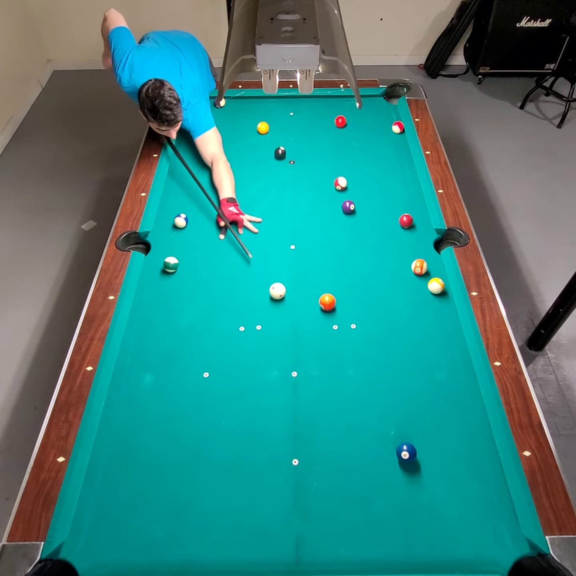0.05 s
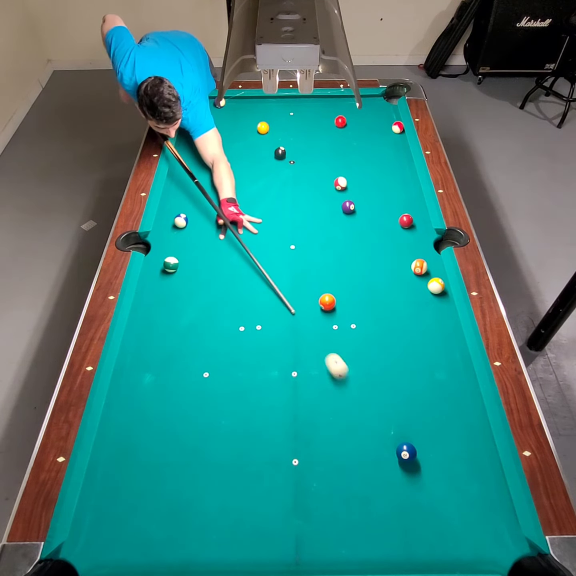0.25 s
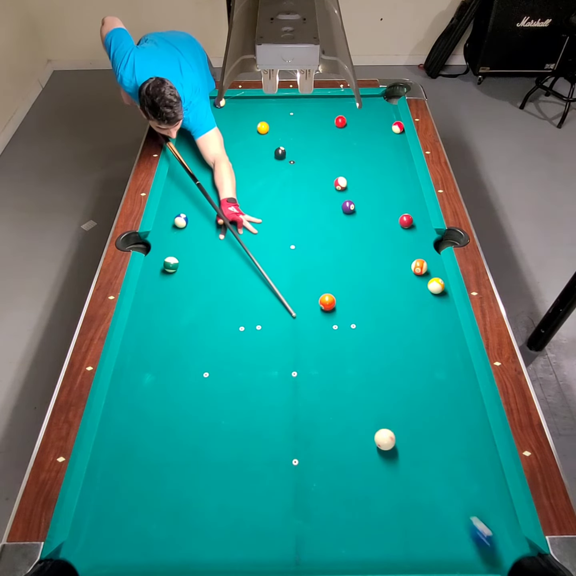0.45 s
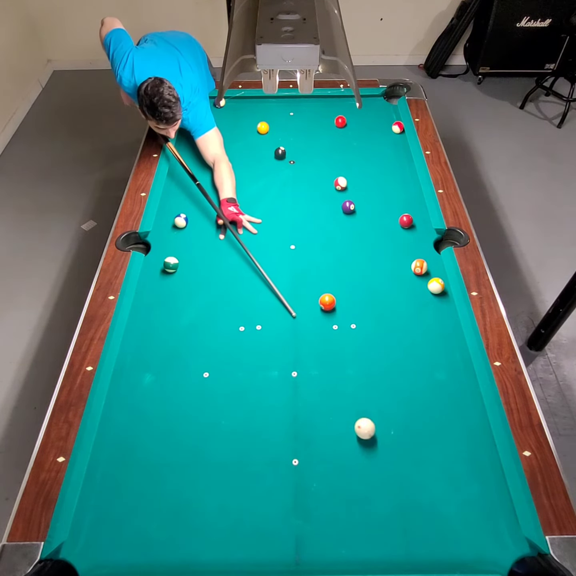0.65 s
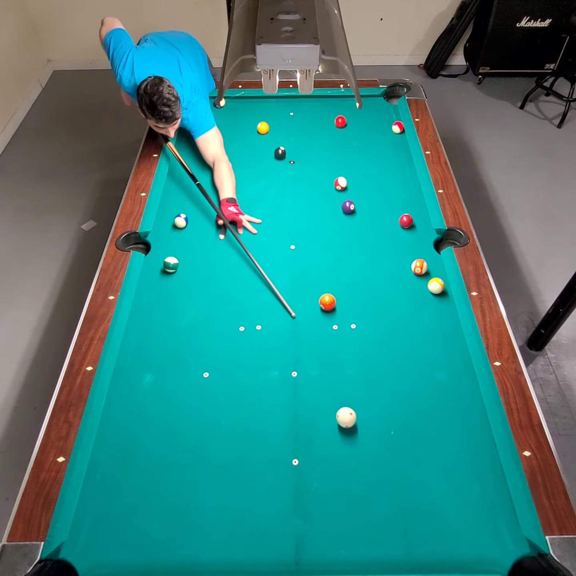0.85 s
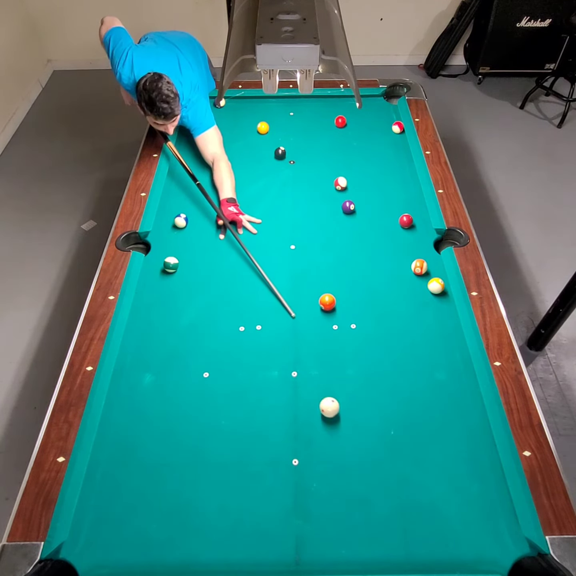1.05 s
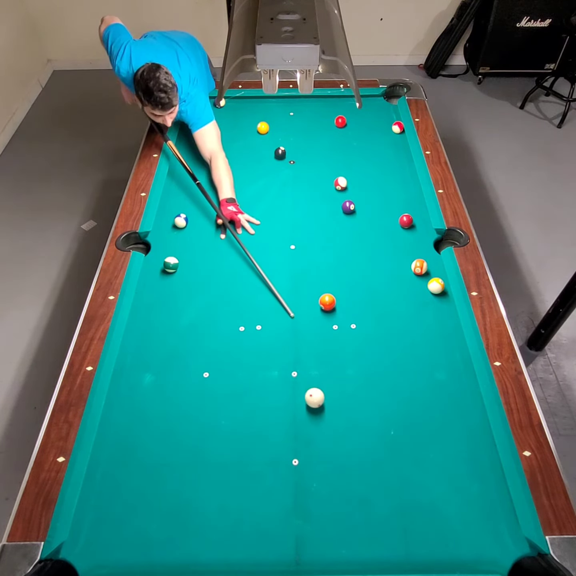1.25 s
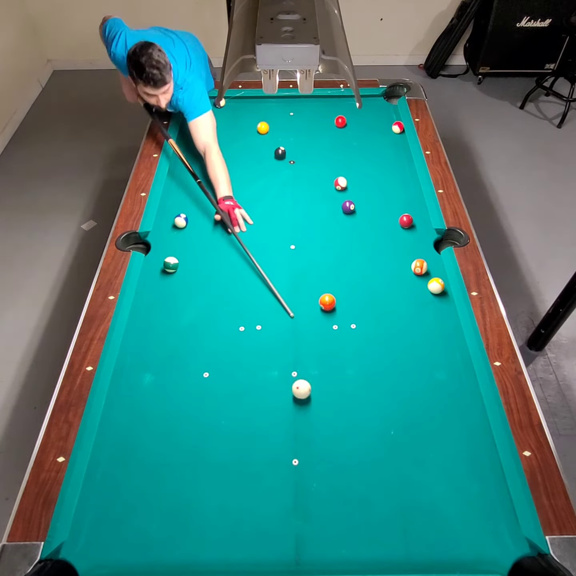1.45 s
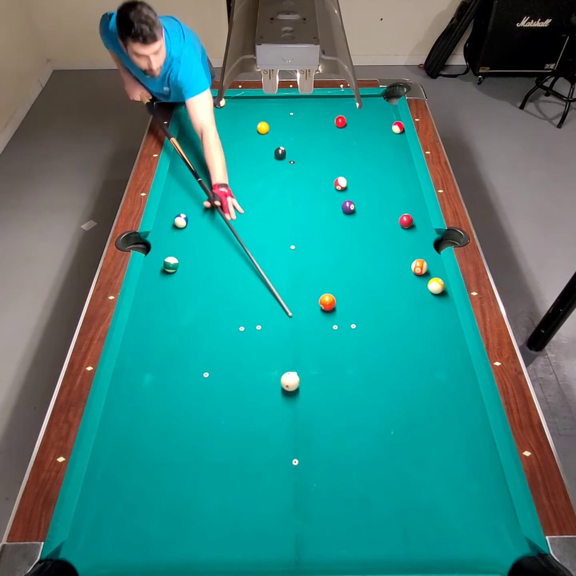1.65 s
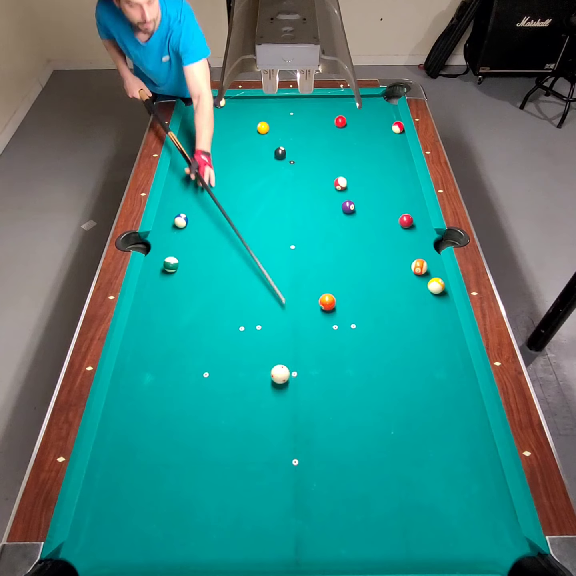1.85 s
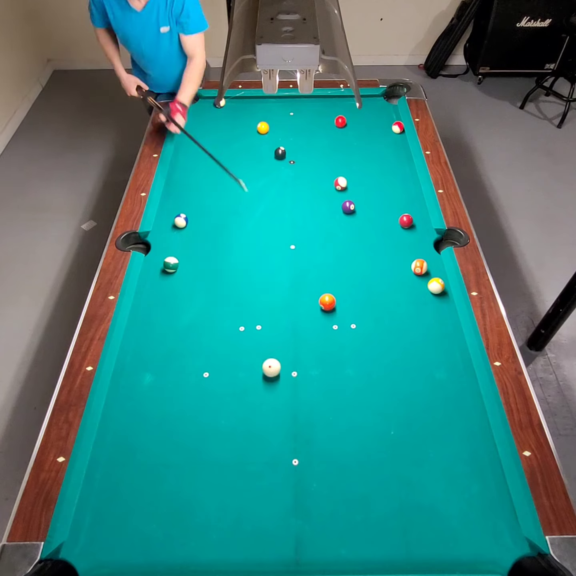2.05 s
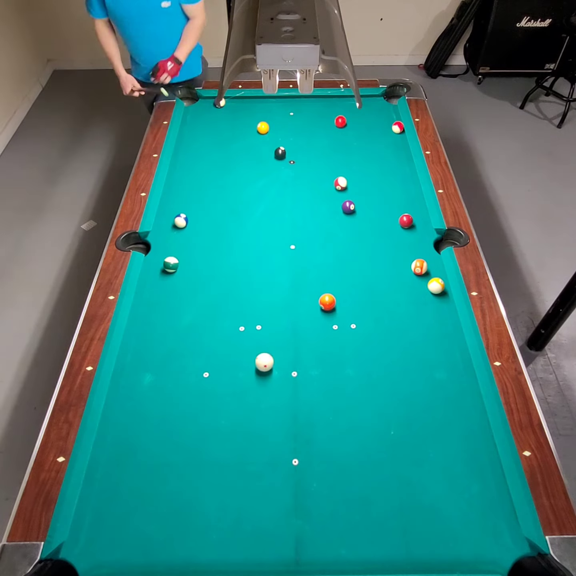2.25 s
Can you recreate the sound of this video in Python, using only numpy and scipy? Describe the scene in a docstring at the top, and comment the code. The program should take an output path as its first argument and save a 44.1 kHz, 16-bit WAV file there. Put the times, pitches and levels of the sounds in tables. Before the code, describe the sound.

A pool shot: cue strike, ball click, then a pocketed ball rumbling through the table.

```python
"""Pool shot in a small, hard room

Heard from the foot of the table. The cue hits the white ball, which clicks against a second ball.
That one rattles into the near right pocket, then rolls and knocks down the return channel inside
the wooden cabinet. Underneath: low room noise and a faint rustle of the player's clothes."""
import sys
import numpy as np
from scipy import signal
from scipy.fft import rfft, irfft, next_fast_len
from scipy.io import wavfile

SR = 44100
rng = np.random.default_rng(int(sys.argv[2]) if len(sys.argv) > 2 else 0)


def output_pcm(signal):
    """Save a mono or channel-first signal as 16-bit PCM at the path in sys.argv[1].

    Samples are clipped to [-1, 1] before scaling.
    """
    pcm = np.clip(np.atleast_2d(signal).T, -1, 1) * 32767
    wavfile.write(sys.argv[1], SR, np.round(pcm).astype(np.int16))


N = 101429
T = np.arange(N) / SR
TAIL_S = T[:int(SR * .8)]  # time axis of one blow
BLOW_S, LEFT_LAG_S = .03, 0.00019
CUE_S, CLICK_S, GRAZE_S = .2241, .4354, .596
CABINET_WET_DB, HOLLOW_WET_DB = -1, -0.5

# room decay (frequency [Hz], t60 [s])
ROOM_DECAY = [(60, 0.11), (300, 0.1842), (1000, 0.2542), (2500, 0.4626), (5000, 0.38), (9000, 0.1851),
              (15000, 0.39)]
# stereo width (frequency [Hz], side over mid [dB])
STEREO_WIDTH = [(60, -15), (160, -13), (350, -7.5), (700, 0.5), (1300, 0.5), (16000, 1.5)]
# room noise, rolling rumble, cabinet boom spectra (frequency [Hz], level [dB])
AIR_SPECTRUM = [(12, -56.5), (30, -36), (55, -13), (140, 0.5), (200, -1.5), (400, -4.5), (700, -12.5),
                (1200, -23), (2500, -24), (4500, -36.5), (6500, -43.5), (8500, -58), (16000, -53)]
RUMBLE_SPECTRUM = [(80, -14), (140, -1.5), (190, -6.5), (270, 5.5), (400, 4.5), (620, 0.5), (850, -8),
                   (1100, -12), (1400, -19.5), (2200, -27), (4000, -51), (8000, -64), (16000, -76)]
BOOM_SPECTRUM = [(15, -69), (30, -45.5), (42, -11), (57, 4), (70, -5), (92, -5.5), (112, -11), (137, -8),
                 (200, -27.5), (500, -72)]
# rolling envelopes (time [s], rumble gain [dB], boom gain [dB])
ROLL_ENVELOPES = [(0.201, -57, -76), (.25, -31, -46.5), (0.502, -42.5, -34), (.595, -49, -44.5),
                  (0.659, -26, -29), (.77, -29.5, -29), (0.879, -25.5, -28), (1.01, -27, -37),
                  (1.14, -35.5, -40), (1.256, -31, -48), (1.33, -22, -32.5), (1.441, -20, -32.5),
                  (1.521, -30.5, -37.5), (1.605, -32, -34.5), (1.72, -20.5, -28.5), (1.94, -20.5, -31),
                  (2.02, -27, -40), (2.13, -37.5, -33.5), (2.223, -79, -52)]
# tip thump, chalk scuff, shaft crack, woody tail, wall echo spectra (frequency [Hz], level [dB])
TIP_SPECTRUM = [(40, -11), (100, 1), (200, -0.5), (400, -3.5), (700, -2.5), (1200, -0.5), (4000, -4)]
CHALK_SPECTRUM = [(2000, -6), (3600, 18), (5000, 10), (7000, 2), (9000, -8), (13500, 4), (16000, -12)]
CRACK_SPECTRUM = [(100, 0), (300, 0), (750, 6.5), (1200, -8.5), (2000, 9), (2900, 0.5), (4200, -9.5),
                  (7000, -46), (10000, -43), (16000, -38)]
BODY_SPECTRUM = [(300, -20), (600, -20), (850, 7), (1250, 8), (1700, -4), (4000, -31.5)]
WALL_SPECTRUM = [(200, -7), (1000, -7), (1600, -8.5), (2300, 3.5), (3000, -25), (6000, -22), (16000, -9)]
# cue shaft modes (frequency [Hz], level [dB], t60 [s])
SHAFT_MODES = [(777, -7, 0.17), (1210, -8, 0.61), (1604, -2, 0.75), (1820, -11, 0.4), (2089, 7, 0.17),
               (2290, -10, 0.18), (2706, 8.5, 0.073), (3200, -19, 0.33)]
# wall echoes of the crack (delay [s], gain [dB])
WALL_ECHOES = [(.0275, -6), (.0315, 3)]
# hardest contacts (time [s], level [dB], left over right [dB])
SNAP_HITS = [(0.4342, -39.5, 16), (0.7109, -52, 17), (0.933, -49, 14.5), (1.263, -60.5, 16)]
# contact snap, ball click spectra (frequency [Hz], level [dB])
SNAP_SPECTRUM = [(5000, -3), (9000, -23.5), (11500, -7.5), (13200, -2), (14500, -6), (16000, -0.5)]
CLICK_SPECTRUM = [(100, -14), (500, -10), (1000, 0), (1400, 2.5), (1850, 6), (2800, 3), (4000, -8),
                  (5500, -34), (9000, -32), (16000, -34)]
# click echoes off table, ceiling, walls (delay [s], gain [dB], left over right [dB])
CLICK_ECHOES = [(.0011, 1.5, 4), (.0030, -9, 2), (0.009, -13, 11), (0.0208, -19, -1), (.0243, -9, 4)]
# room modes rung by the click (frequency [Hz], level [dB], t60 [s])
CLICK_MODES = [(1730, -2, 0.35), (1760, 6, 0.24), (2144, 1, 0.53), (2750, -3.5, 0.41)]
# pocket hits (time [s], thud [dB], liner clack [dB], cabinet ring [dB], favoured pitch [Hz],
# hollow tone [dB], hollow pitch [Hz])
POCKET_HITS = [(.598, -37, -77, -47, 780, -41, 1064), (0.6206, -28, -31, -34.5, 584, -40, 780),
               (0.631, -29.5, -33.5, -32.5, 376, -40, 1047), (0.665, -32.5, -37, -32.5, 725, -32.5, 300),
               (0.7105, -39, -37.5, -51, 302, -35.5, 945), (.731, -46.5, -62, -29.5, 298, -30.5, 240),
               (0.7887, -37, -30.5, -38.5, 314, -29, 377.5), (.802, -26.5, -51, -35.5, 295, -32, 978),
               (.843, -34, -46, -28.5, 282, -35, 742), (0.9251, -28, -44.5, -32.5, 425, -35.5, 643),
               (0.9331, -42, -39.5, -36.5, 420, -42.5, 610), (.948, -38, -62, -27.5, 421, -27, 416)]
# pocket thud, liner clack spectra (frequency [Hz], level [dB])
THUD_SPECTRUM = [(50, -14.5), (160, -7.5), (330, 9.5), (600, 2), (1000, 5), (1300, -10), (2100, -10),
                 (3500, -60), (7000, -49), (16000, -60.5)]
CLACK_SPECTRUM = [(200, -18.5), (1000, 6.5), (2200, 1.5), (3800, -4.5), (5400, -6.5), (7200, -11.5),
                  (8600, -18.5), (11000, -21), (16000, -27.5)]
# cabinet modes (frequency [Hz], level [dB], t60 [s])
CABINET_MODES = [(95.7, -2, .4), (139.3, -2.5, 0.79), (252.1, 1, 0.36), (308, -5, 0.06), (377, 0.5, 0.22),
                 (421, -18, 0.78), (455, -12.5, 0.53), (548, -3.5, 0.46), (615, -3, 0.19),
                 (670.3, -3, 0.33), (780, -2.5, 0.23), (1003, 0.5, 0.34), (1070, -3, 0.13)]
# return channel hits (time [s], knock [dB], rattle [dB], tick [dB], cabinet ring [dB],
# favoured pitch [Hz], hollow tone [dB], hollow pitch [Hz])
CHANNEL_HITS = [(1.2607, -24, -46, -40.5, -24.5, 796, -27, 874),
                (1.276, -34.5, -45.5, -65, -25.5, 780, -25, 296),
                (1.328, -44, -40, -49.5, -34, 395, -28, 540),
                (1.372, -31.5, -41.5, -52, -32, 328, -28, 540),
                (1.45, -47.5, -57, -77.5, -33, 548, -34.5, 528.5),
                (1.612, -29, -36, -57.5, -33.5, 615, -28, 652),
                (1.6328, -25.5, -27, -48.5, -20.5, 390, -18.5, 608),
                (1.655, -34.5, -39, -64, -26, 140, -28.5, 1100),
                (1.691, -32.5, -33, -47, -23.5, 535, -19.5, 377),
                (1.7848, -23, -28.5, -48.5, -27, 664, -24.5, 587),
                (1.804, -30, -46.5, -74.5, -33, 412, -29, 692), (1.849, -27, -42, -75, -27, 377, -26, 644),
                (1.89, -40.5, -41.5, -84, -27, 640, -26.5, 540)]
# channel knock, rattle, tick spectra (frequency [Hz], level [dB])
KNOCK_SPECTRUM = [(50, -42), (100, -1.5), (180, -5), (280, 4.5), (430, 2), (620, -0.5), (1000, 0),
                  (1300, -11), (2200, -25), (4000, -42), (16000, -80)]
RATTLE_SPECTRUM = [(200, -7.5), (600, -11.5), (1150, 9), (1600, 7), (2200, -4), (3000, -14.5),
                   (6000, -33.5), (16000, -57.5)]
TICK_SPECTRUM = [(500, -9), (2000, 7.5), (4500, 1), (6500, -5), (9000, -19), (16000, -29.5)]
# clothing envelope (time [s], level [dB])
RUSTLE_ENVELOPE = [(1.3, -85), (1.47, -73.5), (1.628, -61.5), (1.86, -59), (1.98, -90), (2.101, -93),
                   (2.219, -68), (2.3, -73)]
# clothing spectrum (frequency [Hz], level [dB])
RUSTLE_SPECTRUM = [(2000, -19.5), (6000, 5), (8500, -1), (11500, 3.5), (14000, 1), (16000, 4.5)]


def amp(db):
    """Decibels to gain."""
    return 10 ** (np.asarray(db) / 20)


def decay(t60_s):
    """Exponential fall, 60 dB in t60_s."""
    return np.exp(-np.log(1000) * TAIL_S / t60_s)


def along(points, hz):
    """Interpolate (Hz, value) points over log frequency."""
    point_hz, values = np.array(points, float).T
    return np.interp(np.log(hz + 1e-3), np.log(point_hz), values)


def colour(x, spectrum):
    """Minimum-phase filter, by folding the cepstrum."""
    n = 2 * next_fast_len(x.shape[-1])
    cepstrum = irfft(np.log(amp(along(spectrum, np.arange(n // 2 + 1) * SR / n))))
    cepstrum[1:n // 2] *= 2
    cepstrum[n // 2 + 1:] = 0
    return irfft(rfft(x, n) * np.exp(rfft(cepstrum)))[..., :x.shape[-1]]


def level(x, db):
    """Set the rms level."""
    return x * amp(db) / np.sqrt(np.mean(x ** 2))


def blow(x, db):
    """Scale to the energy of BLOW_S at this rms level."""
    return x * amp(db) * np.sqrt(BLOW_S * SR / np.sum(x ** 2))


def at(x, start_s):
    """Place a sound in the scene."""
    return np.pad(x, (max(int(round(start_s * SR)), 0), N))[:N]


def pan(db):
    """Stereo gains, left over right."""
    return amp(np.array([[db], [-db]]) / 2)


def stereo_noise(size):
    """Diffuse noise: ears alike in the bass, unrelated in the treble."""
    mid, side = rfft(rng.standard_normal((2, size)))
    width = amp(along(STEREO_WIDTH, np.arange(len(mid)) * SR / size))
    return irfft(np.array([mid + width * side, mid - width * side]) / np.sqrt(1 + width ** 2), size)


def room(x, wet_db, left_lag_s=0):
    """Direct sound plus a diffuse tail with a t60 per band."""
    size = len(TAIL_S)
    noise = rfft(stereo_noise(size))
    hz = np.arange(noise.shape[1]) * SR / size
    tail = 0
    for band_hz, t60_s in ROOM_DECAY:
        band = along([(f, f == band_hz) for f, _ in ROOM_DECAY], hz)
        tail += irfft(noise * band, size) * decay(t60_s)
    tail *= 1 - np.exp(-TAIL_S / 0.0055)  # build-up
    tail *= amp(wet_db) / np.sqrt(np.sum(tail ** 2) / 2)
    left, right = x + signal.fftconvolve(x[None], tail, axes=1)[:, :N]
    return np.array([at(left, left_lag_s), right])


def burst(spectrum, t60_s, db):
    """Blow on a body with dense, short-lived modes."""
    return blow(colour(rng.standard_normal(len(TAIL_S)) * decay(t60_s), spectrum), db)


def bursts(spectrum, times_s, levels_db, t60_s):
    """One burst per hit."""
    return sum(at(burst(spectrum, t60_s, db), s) for s, db in zip(times_s, levels_db))


def ring(modes, db):
    """Decaying modes; level, pitch and sign vary per blow."""
    tone = 0
    for hz, mode_db, t60_s in modes:
        scatter, detune, polarity = rng.standard_normal(3)
        sine = np.sin(2 * np.pi * hz * (1 + 0.0041 * detune) * TAIL_S)
        tone += amp(mode_db + .8 * scatter) * np.sign(polarity) * sine * decay(t60_s)
    return blow(tone, db)


def room_air():
    """Steady low room noise."""
    return level(colour(stereo_noise(N), AIR_SPECTRUM), db=-41.5)


def rolling(bumps_per_s=400, spread_db=2):
    """Dense small bumps under the ball rumble in the wood; the cabinet booms."""
    times_s, rumble_db, boom_db = np.array(ROLL_ENVELOPES).T
    onsets = rng.random(N) < bumps_per_s / SR
    strength = amp(spread_db * np.clip(rng.standard_normal(N), -2, 2))
    bumps = onsets * strength * rng.choice([-1, 1], N)
    rumble = level(colour(bumps, RUMBLE_SPECTRUM), db=-5) * amp(np.interp(T, times_s, rumble_db))
    boom = level(colour(stereo_noise(N), BOOM_SPECTRUM), db=0) * amp(np.interp(T, times_s, boom_db))
    return pan(-1) * room(rumble, 0.28, LEFT_LAG_S) + boom


def cue_strike(tip_hz=484, tip_width_s=0.0004):
    """Chalked tip thumps and scuffs the ball; the shaft cracks and rings; walls echo."""
    since_s = T - CUE_S
    shaft_s = CUE_S + 0.00237
    pulse = -np.sin(2 * np.pi * tip_hz * since_s) * np.exp(-.5 * (since_s / tip_width_s) ** 2)
    tip = blow(colour(pulse, TIP_SPECTRUM), db=-29.5)
    chalk = at(burst(CHALK_SPECTRUM, t60_s=0.11, db=-53.5), CUE_S)
    crack = at(burst(CRACK_SPECTRUM, t60_s=0.019, db=-33), shaft_s)
    shaft = at(ring(SHAFT_MODES, db=-31.5), shaft_s)
    body = np.array([at(burst(BODY_SPECTRUM, t60_s=0.56, db=-30), shaft_s) for ear in "LR"])
    echoes = colour(sum(amp(db) * at(crack, s) for s, db in WALL_ECHOES), WALL_SPECTRUM)
    wood = room(crack, wet_db=4.5) + room(shaft, wet_db=-0.96)
    contact = room(tip, wet_db=-1) + room(chalk, wet_db=8.5)
    return pan(1) * (wood + contact + body + echoes)


def snaps():
    """Tiny bright snap on the hardest contacts."""
    return sum(pan(side_db) * room(at(burst(SNAP_SPECTRUM, t60_s=0.041, db=db), s), wet_db=-9.5)
               for s, db, side_db in SNAP_HITS)


def ball_click():
    """Ball on ball: one short pulse, early echoes, lingering room modes."""
    impulse = 1. * (TAIL_S == 0)
    pulse = blow(colour(impulse, CLICK_SPECTRUM), db=-32.5)
    echoes = sum(amp(db) * pan(side_db) * at(pulse, CLICK_S + s) for s, db, side_db in CLICK_ECHOES)
    linger = np.array([at(ring(CLICK_MODES, db=-24.5), CLICK_S) for ear in "LR"])
    return pan(0.66) * (room(at(pulse, CLICK_S), wet_db=15.5) + echoes + linger)


def pocket():
    """The ball grazes a jaw, rattles between jaws and hard liner, and drops."""
    times_s, thud_db, clack_db, ring_db, spot_hz, hollow_db, hollow_hz = np.array(POCKET_HITS).T
    thuds = bursts(THUD_SPECTRUM, times_s, thud_db, t60_s=0.18)
    clacks = bursts(CLACK_SPECTRUM, times_s, clack_db, t60_s=0.03)
    graze = at(burst(CLACK_SPECTRUM, t60_s=0.2, db=-35.5), GRAZE_S)
    rings = sum(map(cabinet_ring, times_s, ring_db, spot_hz))
    tones = sum(map(hollow_tone, times_s, hollow_db, hollow_hz))
    wood = room(thuds, 3, LEFT_LAG_S)
    wood += room(rings, CABINET_WET_DB, LEFT_LAG_S) + room(tones, HOLLOW_WET_DB, LEFT_LAG_S)
    liner = room(clacks + graze, 1, LEFT_LAG_S)
    return pan(-0.9) * wood + pan(0.91) * liner


def cabinet_ring(start_s, db, spot_hz, boost_db=11, width_oct=0.19):
    """Cabinet modes; the struck spot favours those near spot_hz."""
    modes = [(hz, mode_db + boost_db * np.exp(-.5 * (np.log2(hz / spot_hz) / width_oct) ** 2), t60_s)
             for hz, mode_db, t60_s in CABINET_MODES]
    return at(ring(modes, db), start_s)


def hollow_tone(start_s, db, hz, rise_s=0.00068):
    """Hollow tone of the struck spot: fast swell, short decay."""
    swell = 1 - np.exp(-TAIL_S / rise_s)
    return at(blow(swell * np.sin(2 * np.pi * hz * TAIL_S) * decay(t60_s=0.095), db), start_s)


def ball_return():
    """The ball knocks at the channel's steps and turns; the cabinet rings."""
    (times_s, knock_db, rattle_db, tick_db,
     ring_db, spot_hz, hollow_db, hollow_hz) = np.array(CHANNEL_HITS).T
    knocks = bursts(KNOCK_SPECTRUM, times_s, knock_db, t60_s=0.054)
    rattles = bursts(RATTLE_SPECTRUM, times_s, rattle_db, t60_s=0.08)
    ticks = bursts(TICK_SPECTRUM, times_s, tick_db, t60_s=0.023)
    rings = sum(map(cabinet_ring, times_s, ring_db, spot_hz))
    tones = sum(map(hollow_tone, times_s, hollow_db, hollow_hz))
    contacts = pan(0.21) * room(knocks + rattles, 3.5, LEFT_LAG_S) + room(ticks, 5, LEFT_LAG_S)
    wood = room(rings, CABINET_WET_DB, LEFT_LAG_S) + room(tones, HOLLOW_WET_DB, LEFT_LAG_S)
    return contacts + pan(-2.5) * wood


def rustle():
    """Shirt and glove hiss as the player straightens and draws back the cue."""
    times_s, db = np.array(RUSTLE_ENVELOPE).T
    hiss = level(colour(stereo_noise(N), RUSTLE_SPECTRUM), db=0)
    return hiss * amp(np.interp(T, times_s, db)) * (T > times_s[0])


def scene():
    """The whole shot, stereo."""
    impacts = cue_strike() + ball_click() + snaps() + pocket() + ball_return()
    return impacts + rolling() + rustle() + room_air()


def record(dry):
    """Steep 16 kHz low-pass."""
    return signal.sosfilt(signal.ellip(8, .2, 80, 16000, fs=SR, output="sos"), dry)


dry = scene()
out = record(dry)
output_pcm(out)
```